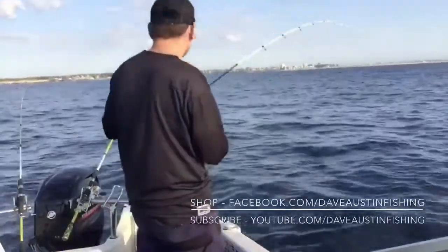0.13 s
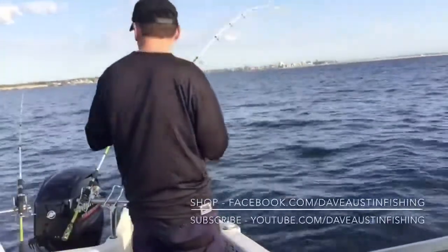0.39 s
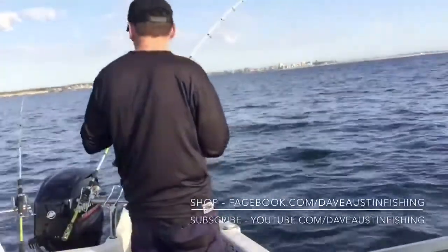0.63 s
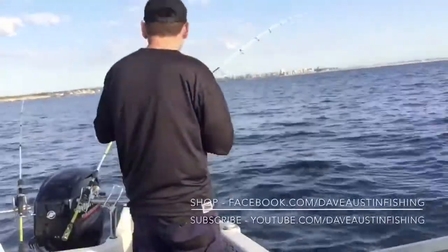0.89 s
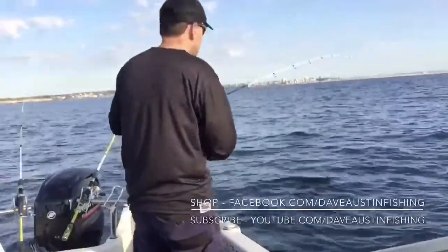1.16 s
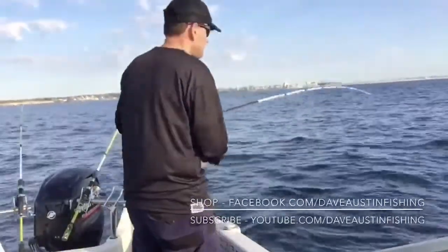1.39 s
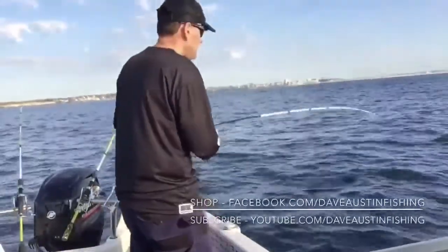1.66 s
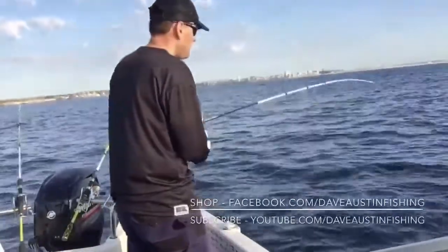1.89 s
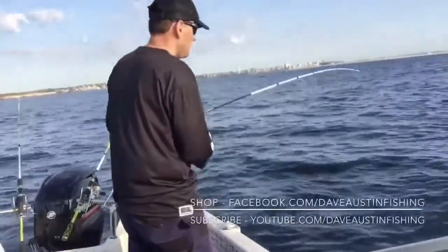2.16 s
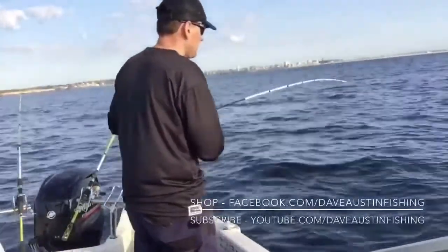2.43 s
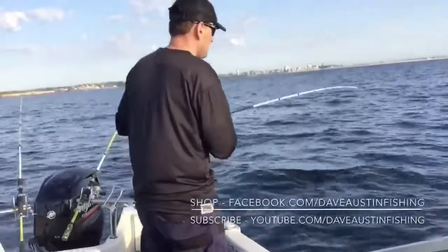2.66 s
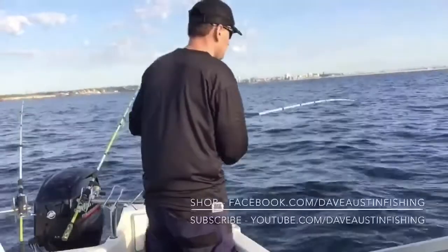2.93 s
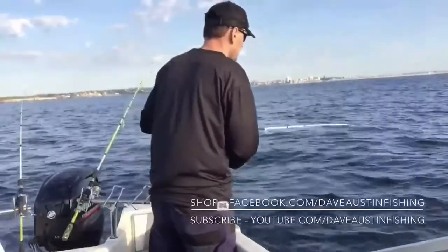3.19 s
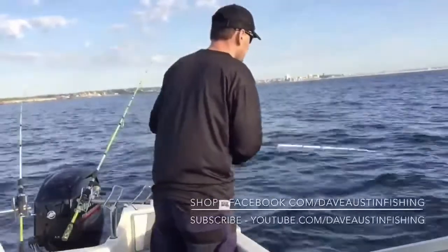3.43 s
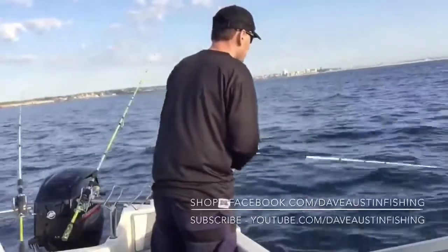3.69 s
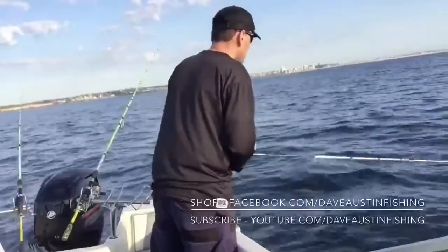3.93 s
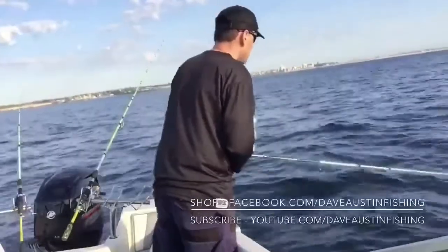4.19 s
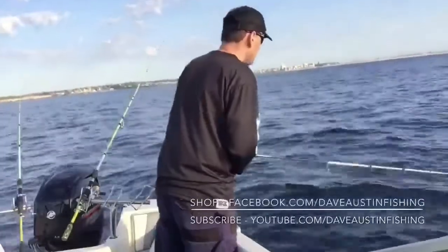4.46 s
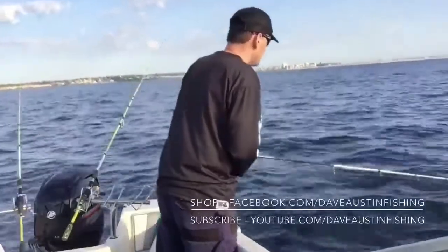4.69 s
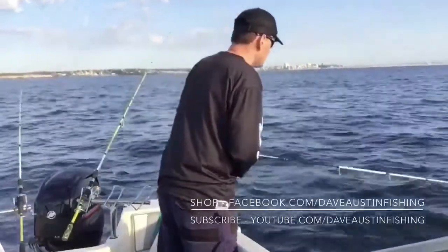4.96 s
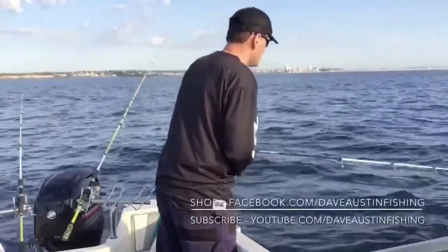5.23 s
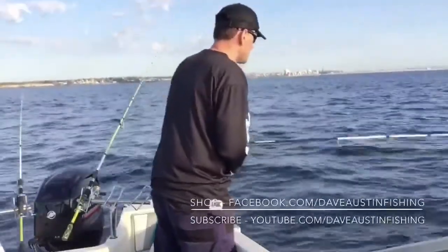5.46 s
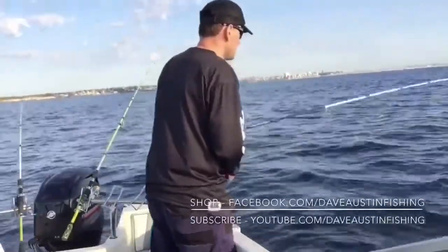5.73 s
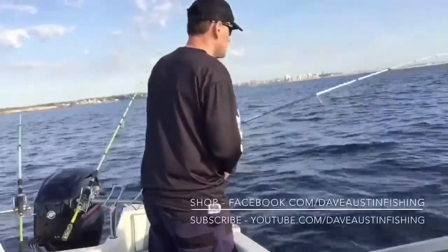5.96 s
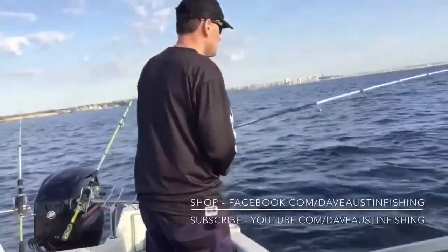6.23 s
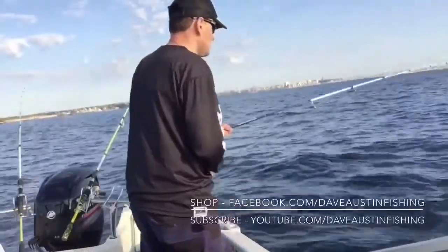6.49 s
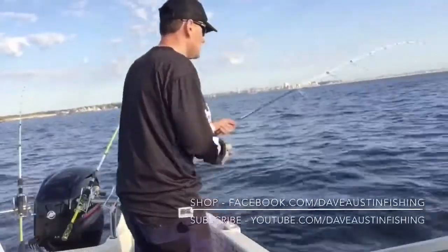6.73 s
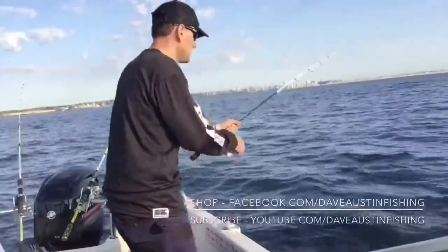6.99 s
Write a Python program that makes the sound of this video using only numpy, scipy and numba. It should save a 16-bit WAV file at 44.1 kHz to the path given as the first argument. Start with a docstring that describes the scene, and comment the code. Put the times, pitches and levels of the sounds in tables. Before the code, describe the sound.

Small waves slap and bubble along a boat hull, with ringing drips, a low fluttering breeze and faint sea hiss behind.

```python
"""A breeze rumbles and flutters on the microphone over the far hiss of the sea, with buffets thumping through.
Water trickles and gurgles along the hull of an open boat; drips and trapped air pockets ring as bubbles.
Wavelets slap it with spray and froth, and some smack it flat. Wind and sea are shaped noise plus falling
thumps; bubbles are damped sines, alone or in swarms; the hollow hull adds a short diffuse ring."""
import sys
import numpy as np
from scipy import signal
from scipy.fft import rfft, irfft, next_fast_len
from scipy.io import wavfile
from scipy.ndimage import uniform_filter1d
from numba import njit

SR = 44100
rng = np.random.default_rng(int(sys.argv[2]) if len(sys.argv) > 2 else 0)


def store_wav(level_fs):
    """Save 16-bit WAV to argv[1]."""
    pcm = np.round(np.clip(np.atleast_2d(level_fs), -1, 1) * 32767)
    wavfile.write(sys.argv[1], SR, pcm.T.astype(np.int16))


def level_to_linear(level):
    """Convert decibel levels to linear amplitude factors, elementwise."""
    exponent = np.asarray(level, float) / 20
    return 10 ** exponent


N = 313859
TIME = np.arange(N) / SR  # seconds

# All levels in the tables are taken before each source's own trim and flicker.
# breeze on the microphone, deep rumble and the flutter above it in pitch: time_s, rumble_db, flutter_db
BREEZE_LEVELS = [(0.0, -52, -41.5), (0.121, -59, -41.5), (0.28, -50.5, -40.5), (0.67, -47, -41),
                 (0.87, -48, -46), (1.29, -51.5, -42.5), (1.4, -50.5, -44), (1.62, -50.5, -48.5),
                 (1.9, -52, -43.5), (2.1, -49, -43.5), (2.43, -51, -46), (2.85, -46, -42),
                 (3.52, -46.5, -45), (3.7, -43.5, -44.5), (4.04, -49, -44.5), (4.43, -46.5, -45.5),
                 (4.87, -48, -48.5), (5.05, -52, -52.5), (5.25, -54.5, -49.5), (5.35, -53.5, -51.5),
                 (5.82, -61, -50.5), (6.06, -70, -43.5), (6.3, -52, -45), (6.57, -47, -46.5),
                 (6.81, -46.5, -43.5), (7.11, -46.5, -44)]
# single buffets of wind: start_s, level_db, starting_pitch_hz, t60_s
WIND_BUFFETS = [(0.119, -25, 184, 0.051), (.24, -24, 149.4, 0.16), (0.275, -20.5, 180, 0.07),
                (0.499, -22.5, 155, 0.046), (1.034, -27.5, 130.2, 0.44), (1.416, -11.5, 152, 0.014),
                (1.691, -10, 173, 0.017), (1.398, -25, 60, 0.088), (1.699, -26.5, 75, 0.1),
                (1.745, -21.5, 88, 0.06), (1.96, -19.5, 111, 0.03), (2.073, -18, 150, 0.03),
                (2.089, -24, 87, 0.12), (2.114, -17.5, 87.7, 0.079), (2.138, -12, 116, 0.034),
                (2.607, -28.5, 127, 0.39), (2.707, -20, 90, 0.04), (3.572, -22, 94.5, 0.064),
                (4.678, -14, 158, 0.032), (4.686, -17.5, 78, 0.075), (4.917, -26.5, 66.6, 0.11),
                (6.199, -17.5, 98, 0.035), (5.935, -27.5, 86, 0.18), (6.369, -24.5, 70, 0.057),
                (6.873, -19, 104, 0.1)]
# relative spectrum of the wind: frequency_hz, density_db_per_hz
WIND_SPECTRUM = [(12, -34), (20, -16.5), (75, 2.5), (203, -0.5), (316, -16.5), (375, -18.5), (485, -44),
                 (600, -36.5), (780, -52.5), (1320, -120)]
# relative spectrum of the sea's hiss: frequency_hz, density_db_per_hz
SEA_SPECTRUM = [(260, -13), (450, 0), (622, -10), (736, -13), (860, -7), (4880, -10.5), (6920, -10.5),
                (9090, -15.5), (9950, -26.5), (12900, -62.5), (21900, -120)]
# water running along the hull: time_s, level_db
TRICKLE_LEVELS = [(0.0, -64), (0.38, -53.5), (0.5, -53.5), (0.59, -69), (.8, -64), (1.05, -62), (1.21, -53),
                  (1.57, -54), (1.88, -61.5), (1.94, -62.5), (2.89, -66.5), (3.7, -68.5), (3.87, -59),
                  (4.1, -71), (4.4, -72), (4.6, -64.5), (4.95, -68.5), (5.25, -71.5), (5.57, -57.5),
                  (5.75, -67.5), (5.9, -60.5), (6.12, -61.5), (6.3, -62.5), (6.42, -72), (6.84, -66),
                  (7.12, -61.5)]
# surges that gurgle under the hull: crest_s, level_db
GURGLE_SURGES = [(0.049, -52.5), (0.497, -49), (1.207, -43.5), (1.34, -41.5), (1.57, -44.5), (1.991, -47.5),
                 (2.299, -54.5), (3.73, -62.5), (5.571, -52), (6.339, -59.5), (6.843, -51.5), (7.1, -56.5)]
# drops whose bubble rings long and clear: time_s, level_db, pitch_hz, t60_s
CLEAR_DRIPS = [(0.015, -57, 1386, 0.092), (0.291, -39, 900, 0.12), (0.308, -37.5, 904, 0.086),
               (0.575, -56, 607, 0.086), (0.61, -63, 1690, .06), (0.635, -58, 1960, 0.073),
               (.655, -57, 1950, 0.1), (0.704, -58, 1940, 0.046), (0.684, -58.5, 2170, 0.1),
               (1.518, -34, 1135, 0.044), (2.095, -53, 667, .09), (2.42, -42.5, 297.7, 0.23),
               (3.43, -48.5, 336, 0.17), (3.826, -56, 1680, 0.1), (3.842, -54.5, 1017, 0.12),
               (3.899, -54.5, 1215, 0.05), (6.015, -59, 1960, 0.14), (6.078, -50.5, 592, 0.082),
               (6.095, -51, 845, 0.057), (6.142, -54, 1255, 0.084), (6.731, -41.5, 1526, 0.028),
               (6.956, -51, 1460, 0.049)]
# the clearest trapped air pockets: time_s, level_db, pitch_hz
AIR_POCKETS = [(0.057, -46, 1050), (0.101, -46, 2350), (0.12, -45, 464), (0.142, -51, 1450),
               (0.193, -43.5, 1740), (0.227, -31.5, 1715), (0.232, -44, 2090), (.385, -42, 1062),
               (0.121, -59, 1085), (0.314, -50, 4020), (0.341, -41, 1425), (0.362, -31.5, 1060),
               (0.39, -53, 4220), (0.408, -54, 2820), (0.426, -49, 2710), (0.471, -48.5, 3090),
               (0.471, -34, 1680), (0.476, -38, 607), (0.485, -38, 1290), (0.769, -52.5, 3060),
               (0.848, -54, 885), (0.856, -50.5, 1660), (0.905, -47.5, 2280), (1.01, -48.5, 2470),
               (0.9, -46, 3100), (1.029, -47, 3020), (1.071, -41, 4550), (1.074, -42, 1600),
               (1.082, -38, 1093), (1.102, -40.5, 1013), (1.162, -48.5, 966), (1.181, -45, 1400),
               (1.19, -43.5, 548), (1.203, -45.5, 2000), (1.262, -47, 540), (1.245, -44.5, 2100),
               (1.278, -41.5, 2140), (1.322, -32.5, 1075), (1.321, -34, 1833), (1.332, -36.5, 387),
               (1.337, -44, 3240), (1.394, -47, 3260), (1.423, -35.5, 433), (1.483, -52, 954),
               (1.52, -38, 1094), (1.562, -44, 3560), (1.564, -42, 2566), (1.58, -38.5, 482),
               (1.629, -35.5, 1046), (1.679, -42.5, 3500), (1.68, -38.5, 1064), (1.738, -49.5, 3340),
               (1.741, -40, 616), (1.744, -35, 844), (1.836, -43.5, 755), (1.851, -41, 1124),
               (1.915, -51, 1290), (1.952, -51, 1050), (1.955, -45.5, 544), (1.998, -43, 1050),
               (2.011, -42.5, 579), (2.122, -55.5, 3120), (2.229, -41, 2590), (2.27, -38, 2670),
               (2.287, -48, 3680), (2.36, -43.5, 3440), (2.362, -50, 6470), (2.376, -53, 3970),
               (2.21, -53, 1305), (2.335, -50, 1440), (2.435, -44.5, 947), (2.462, -48, 2160),
               (2.466, -39, 1480), (2.5, -46, 664), (2.514, -44.5, 1495), (2.55, -40.5, 662),
               (2.543, -38.5, 1170), (2.555, -38, 970), (2.585, -50, 1134), (2.696, -49, 2440),
               (2.714, -50.5, 1940), (2.801, -33.5, 1086), (2.803, -51, 680), (2.831, -50.5, 1077),
               (3.071, -44.5, 2480), (3.209, -47, 2780), (3.321, -49.5, 4220), (3.497, -53, 1135),
               (3.502, -45, 3780), (3.502, -48, 2170), (3.556, -37.5, 3370), (3.702, -45, 440),
               (3.728, -44.5, 443), (3.855, -56, 2010), (3.88, -54, 2030), (3.898, -47, 3200),
               (3.966, -47, 2630), (4.015, -59.5, 1795), (4.11, -59, 1900), (4.471, -48, 3740),
               (4.546, -43.5, 2790), (4.559, -46.5, 1083), (4.594, -52.5, 2640), (4.657, -55, 4400),
               (4.682, -47, 1870), (4.717, -51.5, 2920), (4.765, -43, 900), (4.819, -43.5, 2010),
               (4.831, -51, 4160), (4.862, -54, 1325), (5.094, -52.5, 1745), (5.144, -50.5, 836),
               (5.296, -41.5, 1860), (5.297, -43, 1337), (5.414, -43, 437), (5.391, -43.5, 460),
               (5.404, -51, 1780), (5.46, -57, 1390), (5.476, -51, 3250), (5.492, -51, 1055),
               (5.494, -54.5, 2450), (5.518, -38.5, 426), (5.532, -33, 497), (5.569, -29, 1000),
               (5.57, -38, 1330), (5.575, -53.5, 2015), (5.673, -40, 1250), (5.68, -50.5, 570),
               (5.696, -41.5, 1036), (5.815, -56, 990), (5.882, -43.5, 1236), (5.888, -51, 2000),
               (5.944, -55, 5800), (5.954, -48.5, 2180), (5.993, -49, 943), (6.056, -44, 2170),
               (6.051, -52, 1100), (6.088, -53.5, 2120), (6.12, -60, 2200), (6.218, -32, 2230),
               (6.264, -47.5, 1590), (6.266, -41.5, 2125), (6.377, -56, 2040), (6.79, -49, 2540),
               (6.821, -35, 370), (6.823, -35, 972), (6.841, -28.5, 545), (6.848, -37, 2060)]
# wavelets breaking on the hull: start_s, spray_db, body_above_spray_db, time_scale_s
WAVELET_SLAPS = [(0.166, -52, -19, 0.012), (0.273, -51, 12, 0.014), (0.312, -49, 15, 0.011),
                 (0.459, -53, 24, 0.0071), (0.651, -55.5, 4.5, .011), (0.745, -56, 6, 0.018),
                 (0.872, -53, -7, 0.013), (0.987, -52.5, 11.5, 0.021), (1.025, -49, 5, 0.0082),
                 (1.053, -53, 8, 0.0071), (1.167, -57.5, 8.5, 0.017), (1.3, -45.5, 8.5, 0.02),
                 (1.345, -53.5, -12, 0.01), (1.392, -46.5, -21, 0.011), (1.418, -43.5, -30, 0.02),
                 (1.485, -48.5, 5, 0.034), (1.555, -44, 13.5, 0.0094), (1.673, -49.5, 12, 0.0043),
                 (1.72, -53, -17, 0.018), (1.921, -55, 14, 0.017), (1.969, -49.5, -19, 0.024),
                 (2.213, -52, 2, 0.012), (2.256, -50.5, 10, 0.013), (2.349, -47.5, -9, 0.005),
                 (2.373, -45, -8, .004), (2.474, -51, 1.5, 0.011), (3.295, -52.5, -10, 0.0033),
                 (3.487, -53.5, 9.5, 0.015), (3.554, -38, -3, 0.0031), (3.905, -50, 12, 0.004),
                 (4.463, -50, 3, 0.0083), (4.532, -57, 15, 0.025), (4.816, -54.5, 14.5, 0.0073),
                 (5.267, -63, 17, 0.021), (5.553, -54, 17, 0.0053), (5.661, -60.5, 20, 0.0049),
                 (5.933, -54.5, -11, 0.0052), (6.032, -50, 1.5, 0.018), (6.231, -48.5, 7, 0.023),
                 (6.779, -47.5, -17, 0.013), (6.836, -40, 14.5, 0.012), (7.08, -62, 13, 0.011)]
# waves that hit the hull flat: start_s, level_db, hold_s
FLAT_SMACKS = [(0.358, -55.5, 0.035), (0.459, -44.5, 0.024), (1.065, -48.5, 0.014), (1.319, -46.5, 0.021),
               (1.679, -44, .015), (1.735, -45.5, 0.012), (2.066, -56, 0.0094), (4.555, -71, .04),
               (5.562, -48, 0.019), (5.66, -60, 0.014), (6.819, -35, 0.042)]
# relative spectrum of a flat hit: frequency_hz, density_db_per_hz
SMACK_SPECTRUM = [(200, -22), (330, 4), (550, 6.5), (1000, -5.5), (2000, -11.5), (4000, -17.5), (8000, -35),
                  (12000, -54)]

SWELL_S = 0.0021  # a pocket's soft onset; drips and pockets start two of these before their listed time


def unit(x):
    """Scale to rms 1."""
    return x / np.sqrt(np.mean(x ** 2))


def band(x, lo_hz, hi_hz):
    """Keep the range between two frequencies, with gentle slopes."""
    return signal.sosfilt(signal.butter(2, [lo_hz, hi_hz], "band", fs=SR, output="sos"), x)


def noise_band(lo_hz, hi_hz):
    """Band-passed white noise at rms 1."""
    return unit(band(rng.standard_normal(N), lo_hz, hi_hz))


def coloured(points):
    """Noise at rms 1 whose spectrum is drawn through the points on a log-frequency axis."""
    hz, db = np.transpose(points)
    size = next_fast_len(N)
    f = np.maximum(np.fft.rfftfreq(size, 1 / SR), 1)
    gain = level_to_linear(np.interp(np.log(f), np.log(hz), db))
    return unit(irfft(rfft(rng.standard_normal(size)) * gain, size)[:N])


def walk(rate_hz):
    """A wandering control: random values, each held 1 / rate_hz, smoothed twice; rms about 1."""
    hold = int(SR / rate_hz)
    steps = np.repeat(rng.standard_normal(N // hold + 1), hold)
    return unit(uniform_filter1d(uniform_filter1d(steps, hold), hold)[:N])


def add(out, start_s, piece):
    """Mix a short sound in at a moment."""
    i = int(max(start_s, 0) * SR)
    out[i:i + len(piece)] += piece[:max(len(out) - i, 0)]


def ring(hz, t60, rise, glide, turn):
    """A damped sine that swells in softly; its pitch slides by the fraction glide over t60 (s)."""
    t = np.arange(int(t60 * SR) + 1) / SR
    phase = 2 * np.pi * (hz * (t + glide * t ** 2 / t60 / 2) + turn)
    swell = (1 - np.exp(-t / rise)) ** 2
    return swell * np.exp(-np.log(1000) * t / t60) * np.sin(phase)


def swarm(count, lo_hz, octaves, cycles, tilt_db):
    """Bubbles at random moments, pitches and sizes, each dying by 60 dB within the given cycles; rms 1."""
    out = np.zeros(N)
    for when, size, pitch, turn in rng.random((count, 4)):
        hz = lo_hz * 2 ** (octaves * pitch)
        # 0.97 of the size law is in use: the rare giants are absent
        size_db = -3.5 * np.log(1 - 0.97 * size)
        bubble = ring(hz, cycles / hz, rise=3.4 / hz, glide=0.073, turn=turn)
        add(out, when * N / SR, level_to_linear(size_db + tilt_db * pitch) * bubble)
    return unit(out)


@njit
def moving_bandpass(x, hz, damp):
    """State-variable band-pass with a moving centre."""
    y, b, l = np.empty(len(x)), 0., 0.
    for i in range(len(x)):
        g = np.tan(np.pi * hz[i] / SR)
        v = (b + g * (x[i] - l)) / (1 + g * (g + damp))
        b, l, y[i] = 2 * v - b, l + 2 * g * v, damp * v
    return y


def breeze():
    """Turbulence on the microphone port: deep rumble, flutter with eddies of wavering hum, falling buffets."""
    time_s, rumble_db, flutter_db = np.transpose(BREEZE_LEVELS)
    split_hz = 115
    wind = coloured(WIND_SPECTRUM) * level_to_linear(1.8 * walk(14))
    deep = unit(band(wind, 40, split_hz))
    upper = unit(band(wind, split_hz, 4000))
    eddy_hz = 125 * np.exp(0.15 * walk(5))
    eddies = unit(moving_bandpass(rng.standard_normal(N), eddy_hz, 0.3)) * level_to_linear(1.6 * walk(20))
    flutter = upper + level_to_linear(-0.5) * band(eddies, 37, 305)
    gust_db = 2.2 * walk(12)  # gusts heave rumble and flutter together
    steady = level_to_linear(np.interp(TIME, time_s, rumble_db) + gust_db + 6) * deep
    steady += level_to_linear(np.interp(TIME, time_s, flutter_db) + gust_db + 1.5) * flutter
    thumps = np.zeros(N)
    for start_s, db, hz, t60 in WIND_BUFFETS:
        add(thumps, start_s, level_to_linear(db) * ring(hz, t60, rise=0.0013, glide=-0.61, turn=0))
    return band(steady + band(thumps, 32, 3000), 25, 2600)  # the microphone drops the deepest bass


def sea():
    """Far waves and the microphone's own noise: a steady, finely grained hiss."""
    return level_to_linear(-70 + 0.61 * walk(40)) * coloured(SEA_SPECTRUM)


def trickle():
    """Small bubbles and single drops over a wet wash, and deep gurgles that surge under the hull."""
    time_s, level_db = np.transpose(TRICKLE_LEVELS)
    wash = noise_band(350, 2200) * level_to_linear(4.1 * walk(29))
    small = swarm(count=800, lo_hz=520, octaves=2.4, cycles=36, tilt_db=-11)
    drops = swarm(count=300, lo_hz=900, octaves=1.9, cycles=70, tilt_db=-7)
    running = level_to_linear(-3) * small + level_to_linear(-9) * wash + level_to_linear(-9) * drops
    gurgles = swarm(count=1100, lo_hz=297.6, octaves=1.566, cycles=9.8, tilt_db=-22.5)
    gurgles = gurgles + 0.49 * noise_band(170, 990)  # the slosh round the gurgles
    rise_db_per_s, fall_db_per_s, calm_db = 139.5, 100.5, -67.0
    gurgle_db = np.full(N, calm_db)
    for crest_s, db in GURGLE_SURGES:
        below_crest_db = np.maximum(rise_db_per_s * (crest_s - TIME), fall_db_per_s * (TIME - crest_s))
        gurgle_db = np.maximum(gurgle_db, db - below_crest_db)
    return level_to_linear(np.interp(TIME, time_s, level_db)) * running + level_to_linear(gurgle_db) * gurgles


def drips():
    """Lone bubbles ring clearly, each rising slightly in pitch as it nears the surface."""
    out = np.zeros(N)
    for time_s, db, hz, t60 in CLEAR_DRIPS:
        add(out, time_s - 2 * SWELL_S, level_to_linear(db + 6) * ring(hz, t60, rise=0.002, glide=0.058, turn=0))
    return out * level_to_linear(3 * walk(120))


def cavity_fizz(noise, hz):
    """A collapsing cavity fizzes in a wide band round its pitch: a quick burst and a weaker, longer trail."""
    t = np.arange(len(noise)) / SR
    burst = (t / 0.0073) * np.exp(1 - t / 0.0067)
    trail = 0.32 * (t / 0.023) * np.exp(1 - t / 0.014)
    wide = band(band(noise, hz, hz * 1.96), hz / 1.66, hz * 1.054)
    return unit(wide) * (burst + trail)


def plops():
    """Trapped air pockets swell in and ring at their pitch, with fizz and four neighbours close in time."""
    out = np.zeros(N)
    chance = rng.random((len(AIR_POCKETS), 4, 4))
    fizz = rng.standard_normal((len(AIR_POCKETS), SR // 16))
    for (time_s, db, hz), neighbours, noise in zip(AIR_POCKETS, chance, fizz):
        t60 = 0.053 * (hz / 1000) ** -0.56  # bigger, deeper pockets ring longer
        add(out, time_s - 2 * SWELL_S, level_to_linear(db + 6) * ring(hz, t60, rise=SWELL_S, glide=0, turn=0))
        add(out, time_s - 0.008, level_to_linear(db - 15.5) * cavity_fizz(noise, hz))
        for late, off, turn, slide in neighbours:
            near_hz = hz * np.exp(0.24 * (off - 0.45))
            near = ring(near_hz, 0.51 * t60, rise=SWELL_S, glide=0.27 * (slide - 0.45), turn=turn)
            add(out, time_s + 0.03 * (late - 0.2), level_to_linear(db + 1.5) * near)
    return out * level_to_linear(3.2 * walk(150))  # the wobbling surface roughens every ring


def slaps():
    """Breaking wavelets: a burst of spray over a ragged froth of short bubbles that builds and dies."""
    spray_noise = rng.standard_normal(N)
    spray = unit(band(band(spray_noise, 2500, 7500), 3000, 8000)) * level_to_linear(5.3 * walk(250))
    # droplets ring in the spray
    spray = spray + 0.92 * swarm(count=2500, lo_hz=3226, octaves=1.3, cycles=73, tilt_db=3)
    froth = swarm(count=7000, lo_hz=900, octaves=2.32, cycles=26, tilt_db=5.5)
    froth = froth + 0.31 * noise_band(1700, 2800)  # the finest foam merges into a rush
    spray_gain, froth_gain = np.zeros(N), np.zeros(N)
    for start_s, db, body_db, scale_s in WAVELET_SLAPS:
        t = np.arange(int(6 * scale_s * SR) + 1) / (scale_s * SR)  # in time scales
        shape = (1 - np.exp(-t / 0.84)) ** 2 * np.exp(-t ** 0.98)
        add(spray_gain, start_s, level_to_linear(db) * shape)
        add(froth_gain, start_s, level_to_linear(db + body_db) * shape)
    return level_to_linear(-2.5) * spray_gain * spray + froth_gain * froth


def smacks():
    """A sheet of water hits at once, roars broadly while it spreads, then drops away."""
    rise_s, fall_s = 0.0011, 0.0048
    gain = np.zeros(N)
    for start_s, db, hold_s in FLAT_SMACKS:
        t = np.arange(int((hold_s + 8 * fall_s) * SR)) / SR
        shape = (1 - np.exp(-t / rise_s)) * np.exp(-np.maximum(t - hold_s, 0) / fall_s)
        add(gain, start_s, level_to_linear(db) * shape)
    return gain * coloured(SMACK_SPECTRUM) * level_to_linear(1.3 * walk(200))


def hull(x):
    """The hollow boat answers with a short diffuse ring: a decaying noise tail of unit energy, 9 dB down."""
    t60_s = 0.088
    t = np.arange(int(t60_s * SR)) / SR
    decay = np.exp(-np.log(1000) * t / t60_s) * (1 - np.exp(-t / 0.0043))
    tail = rng.standard_normal(len(t)) * decay
    return x + level_to_linear(-9) * signal.fftconvolve(x, tail / np.sqrt(np.sum(tail ** 2)))[:N]


def scene():
    """Wind at the microphone, sea all round, water at the hull; one channel."""
    wind_and_sea = breeze() + sea()
    water = trickle() + drips() + plops() + slaps() + smacks()
    return (wind_and_sea + hull(water))[None]


def band_limit(x):
    """A steep low-pass at the top of the band."""
    return signal.sosfilt(signal.butter(12, 10100, fs=SR, output="sos"), x)


def record(dry):
    """The recorder cuts the top steeply above 10050 Hz."""
    top_cut = signal.ellip(8, 0.2, 60, 10050, fs=SR, output="sos")
    mix = signal.sosfilt(top_cut, dry)
    return band_limit(mix)


dry = scene()
out = record(dry)
store_wav(out)
```